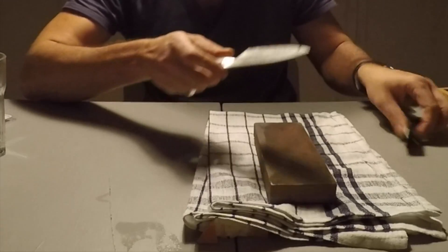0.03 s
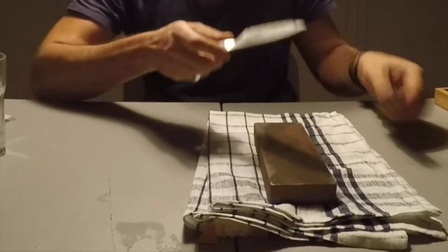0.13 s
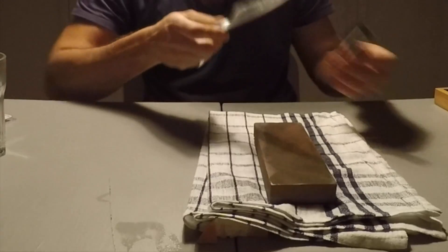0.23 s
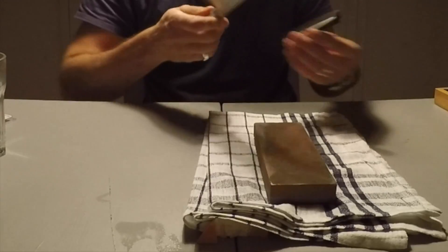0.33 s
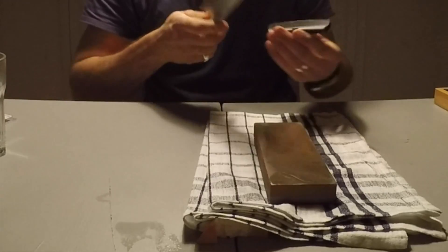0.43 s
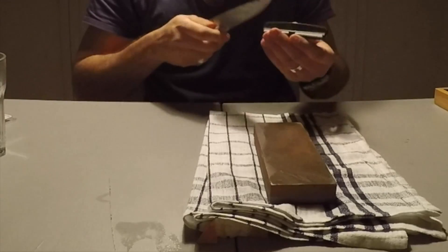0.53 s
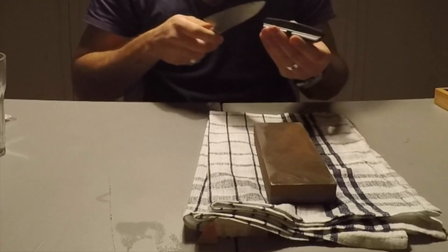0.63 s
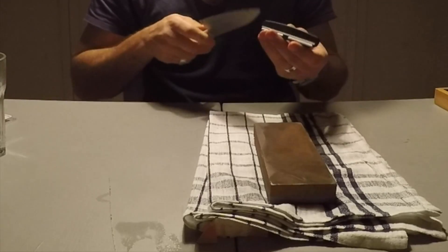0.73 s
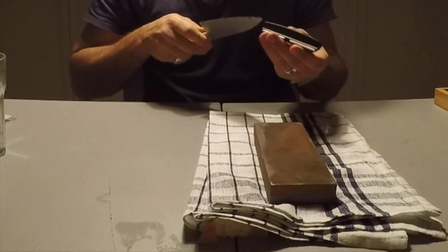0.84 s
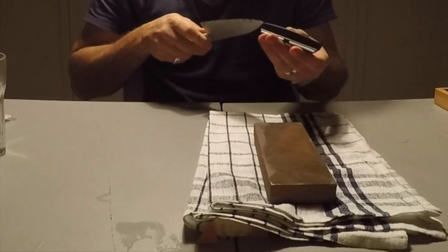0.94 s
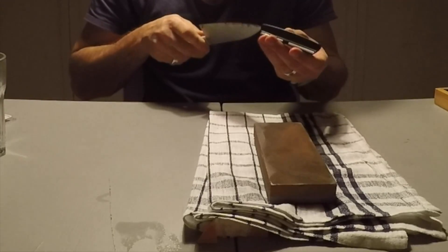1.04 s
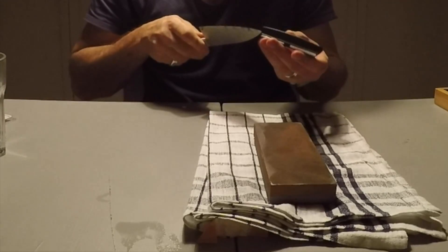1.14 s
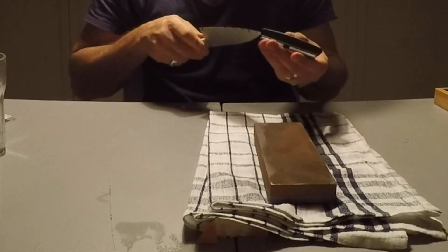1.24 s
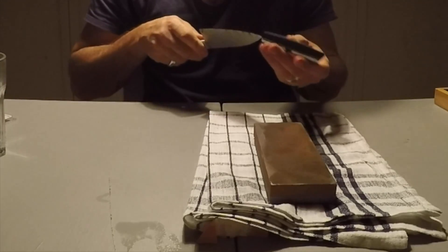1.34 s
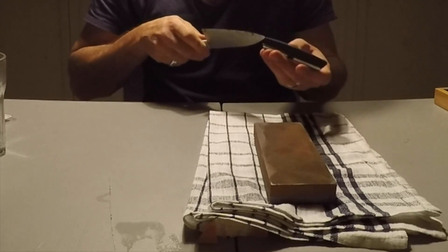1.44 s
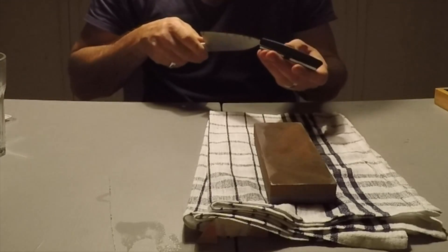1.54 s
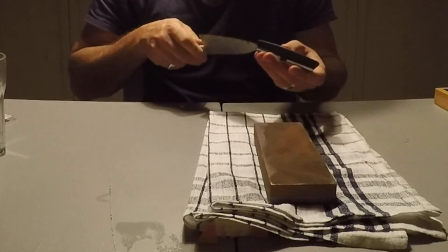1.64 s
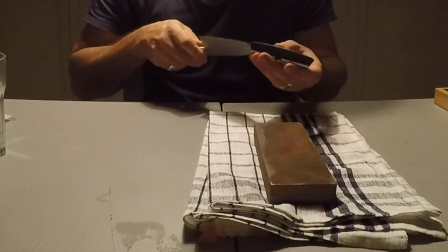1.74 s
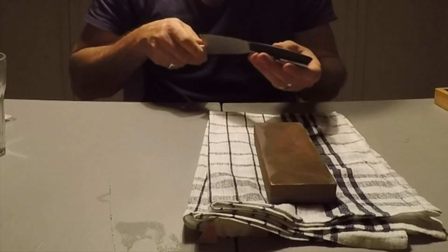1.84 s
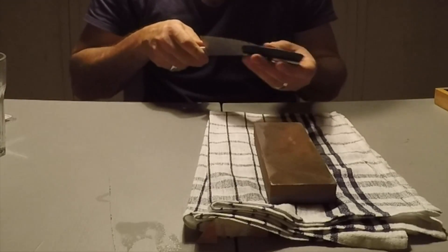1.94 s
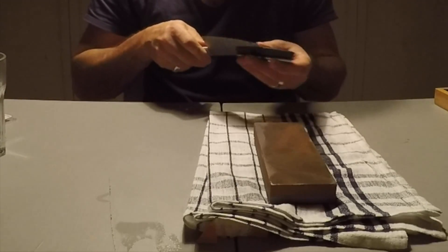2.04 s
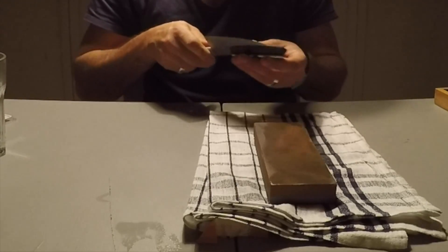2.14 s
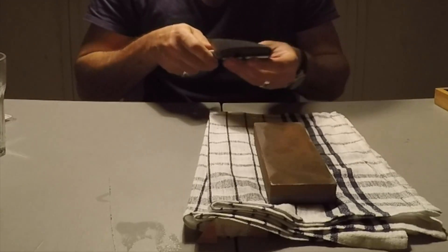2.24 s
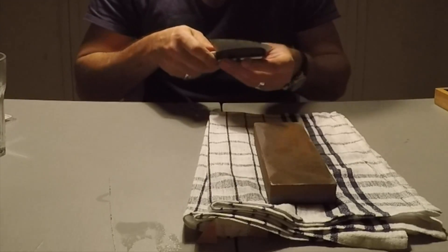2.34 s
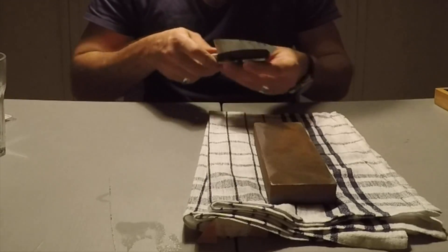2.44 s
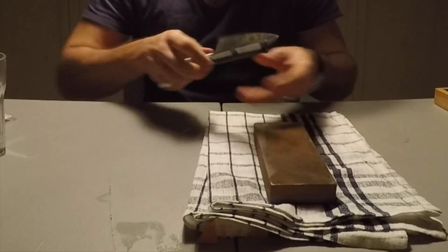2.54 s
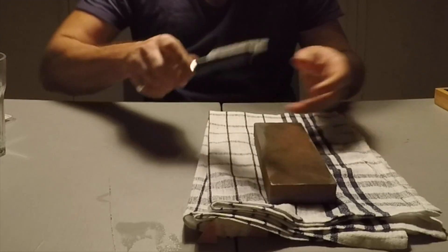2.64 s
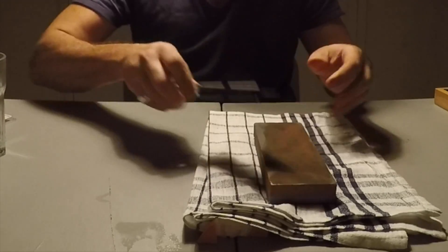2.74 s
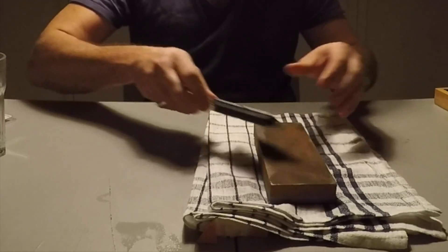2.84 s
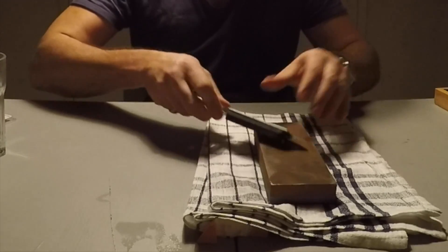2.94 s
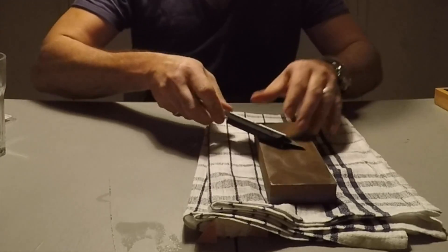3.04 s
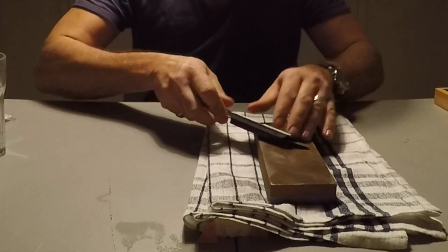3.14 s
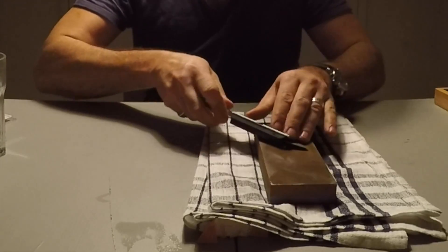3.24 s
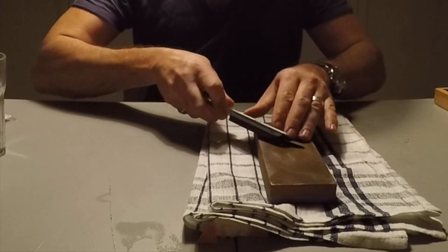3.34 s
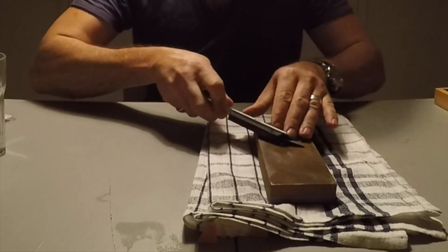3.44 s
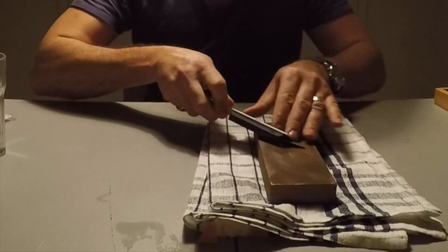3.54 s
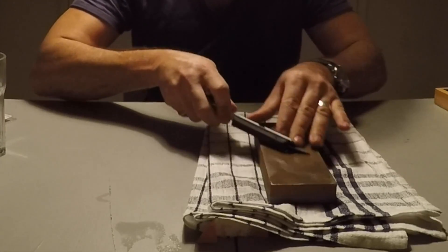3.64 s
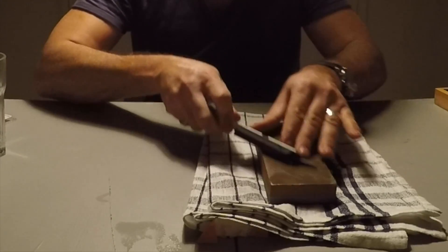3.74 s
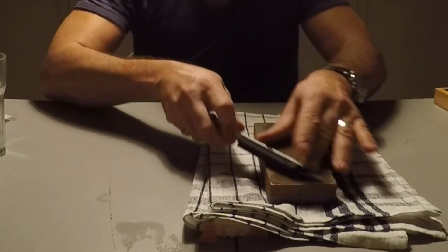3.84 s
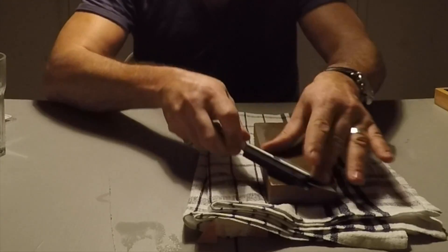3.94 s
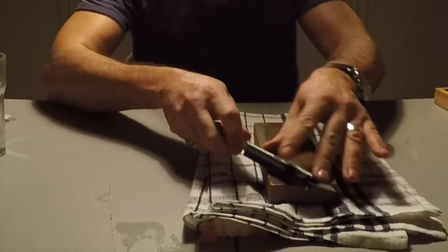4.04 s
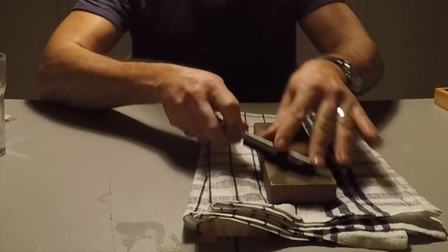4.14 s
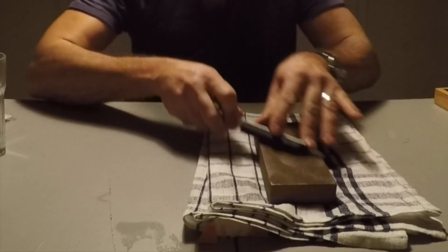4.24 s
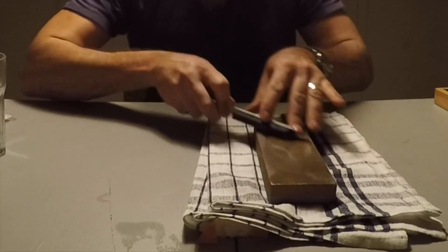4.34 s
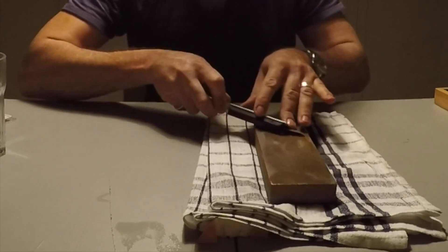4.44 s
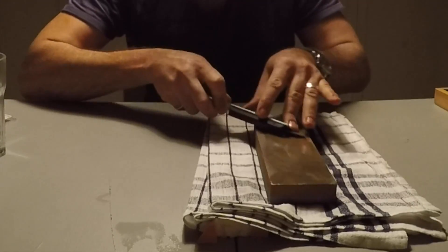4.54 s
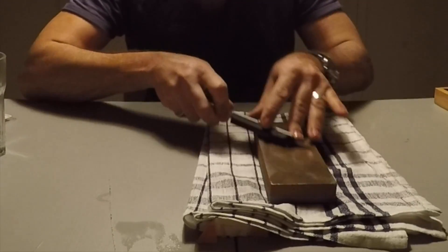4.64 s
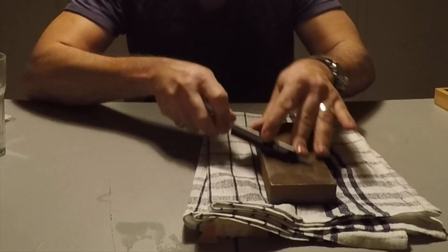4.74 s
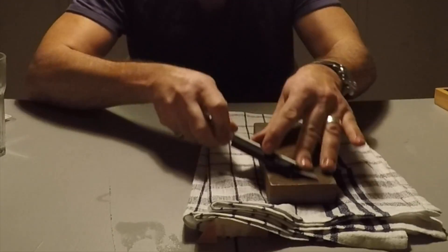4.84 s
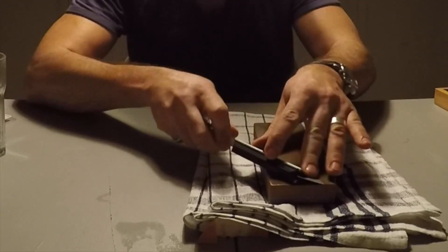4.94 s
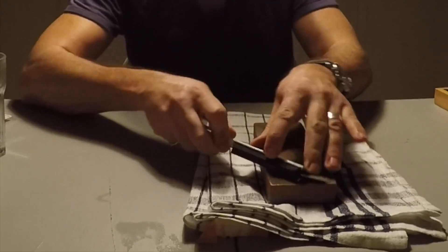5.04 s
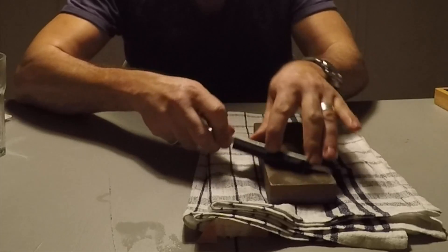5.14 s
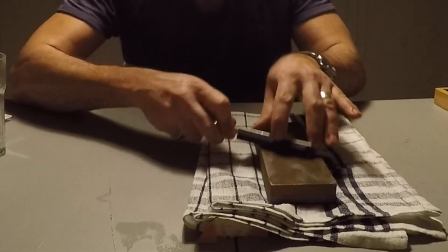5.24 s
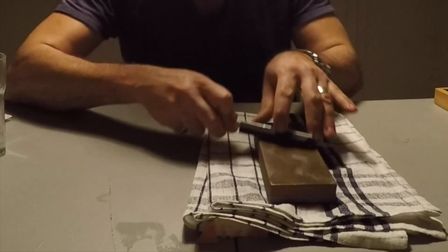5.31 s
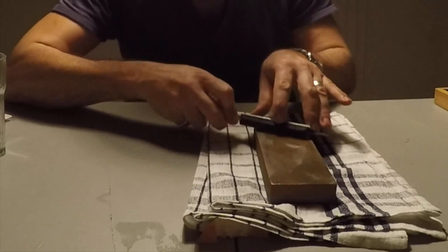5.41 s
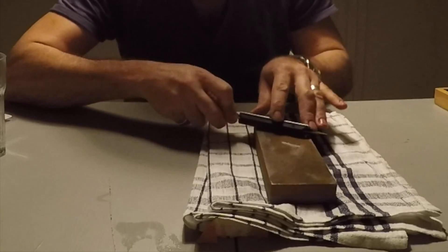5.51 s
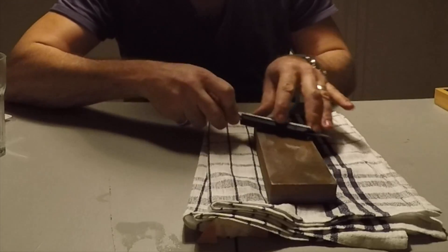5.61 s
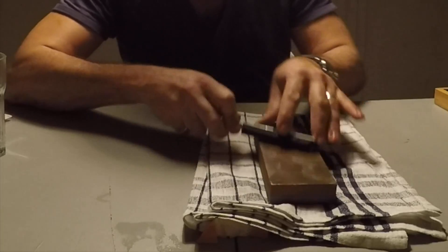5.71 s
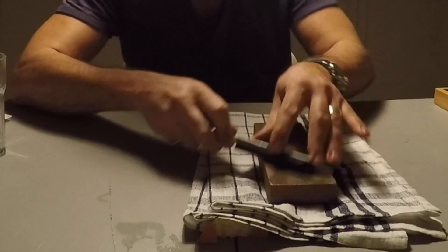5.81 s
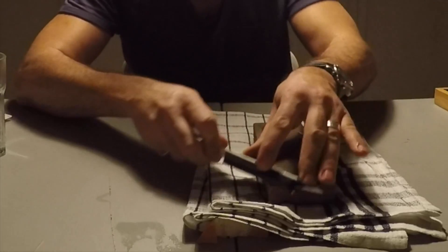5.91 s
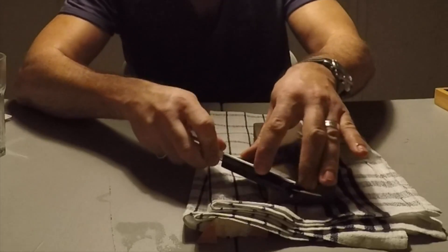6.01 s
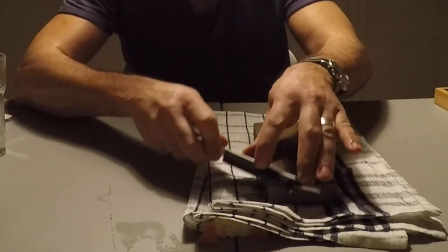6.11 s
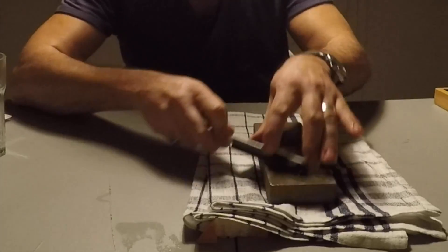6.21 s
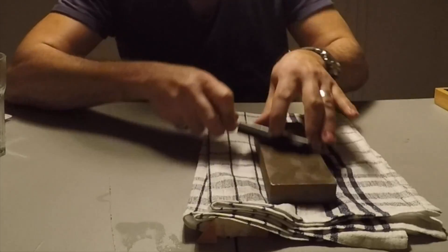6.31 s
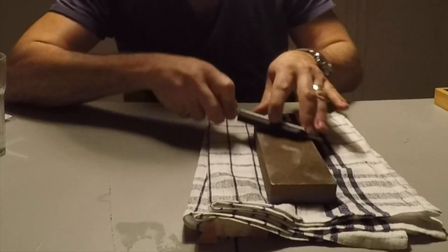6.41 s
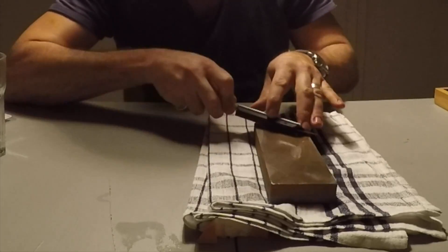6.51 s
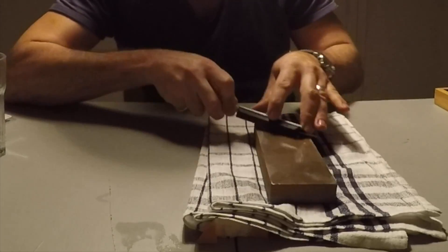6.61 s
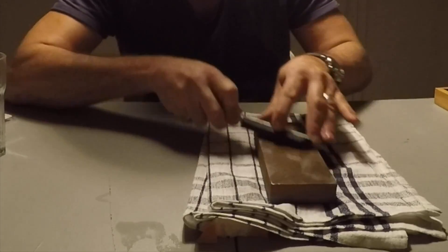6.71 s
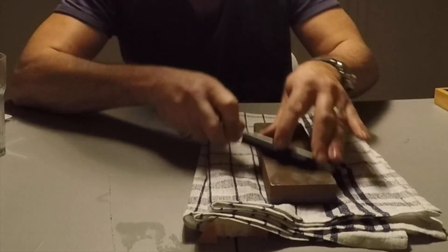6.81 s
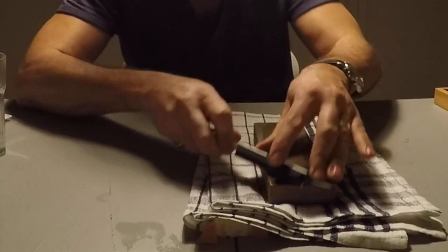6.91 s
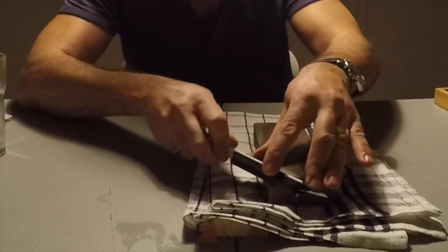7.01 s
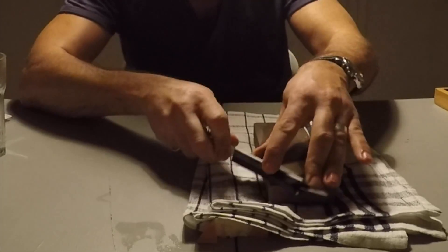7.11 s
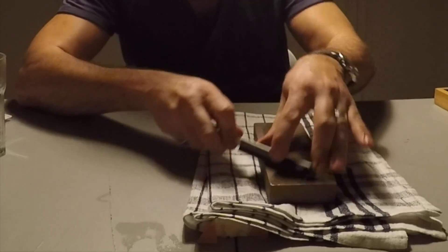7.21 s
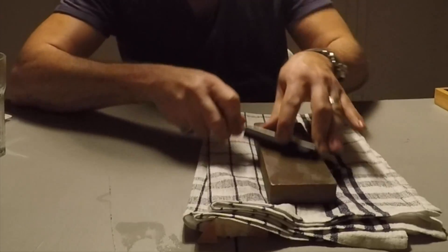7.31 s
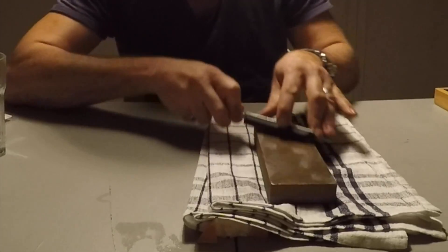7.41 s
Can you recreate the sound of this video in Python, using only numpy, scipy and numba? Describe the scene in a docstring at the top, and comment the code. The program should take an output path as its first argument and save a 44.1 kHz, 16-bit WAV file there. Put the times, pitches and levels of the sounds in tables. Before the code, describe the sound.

A small indoor room with quiet low rumble and a barely audible high whine, heard close up. At the very start a soft knock and dull thud on a table, a faint tick near 0.4 s, then near quiet. From 1.1 to 1.9 s small dry metallic ticks, clearest at 1.14 s, as a guide touches a knife spine; from 1.9 to 2.4 s it slides along with a thin, swelling, hissy rub that stops abruptly. At 2.8 s the free blade gives a bright short clink. At 3.08 s the edge hits the wet stone with a loud sharp clack, and quick short scrapes follow until 3.5 s. From 3.6 s to the end, loud alternating strokes of about half a second each rasp, ring and hiss, dipping at every turn, with gritty clicks around 4.8, 5.9, 6.3 and 6.8 s over a low pulsing table drone.

```python
"""A kitchen knife is sharpened on a wet whetstone on a towel on a table, in a small room with a faint whine.
First an angle guide knocks on the table (damped table modes), ticks against the spine and slides on
(scuffs and friction noise that excite the held blade); then the free blade clinks (modal ringing).
The knife lands on the stone and is pushed to and fro: grit impacts drive the modes of the pressed blade,
broad rasp and fine hiss come from filtered impacts, and friction keeps the table droning.
"""
import sys
import numpy as np
from scipy import signal
from scipy.fft import rfft, irfft
from scipy.io import wavfile
from scipy.ndimage import uniform_filter1d
from numba import njit

SR = 44100
rng = np.random.default_rng(int(sys.argv[2]) if len(sys.argv) > 2 else 0)


def int16_out(signal):
    """Quantize to a 16-bit WAV file."""
    q = np.round(np.clip(np.atleast_2d(signal).T, -1, 1) * 32767)
    wavfile.write(sys.argv[1], SR, q.astype(np.int16))


N = 329074
TIME = np.arange(N) / SR


def amp(db):
    """Logarithmic level: decibels to amplitude gain."""
    return 10 ** (np.asarray(db) / 20)


def rms_one(x):
    """Power normalisation: scale to unit mean square."""
    return x / np.sqrt(np.mean(x ** 2) + 1e-20)


def peak_one(x):
    """Peak normalisation: scale to unit height."""
    return x / (np.abs(x).max() + 1e-20)


def drift(rate):
    """Low-rate random modulation: interpolated chance of about unit spread, with rate new values a second."""
    knots = rng.standard_normal(8192)
    return np.interp(TIME * rate, np.arange(len(knots)), rms_one(knots))


def after(s):
    """Onset gate: zero until a moment, then a 5 ms ramp to one."""
    return np.clip((TIME - s) / .005, 0, 1)


def hump(s, width_s):
    """Gaussian window: a smooth bump of height one around a moment."""
    return np.exp(-np.minimum(((TIME - s) / width_s) ** 2, 20))


def colour(x, spectrum):
    """Minimum-phase filtering: a causal response, folded from the cepstrum, follows a spectrum."""
    size = 8192
    hz, db = np.transpose(spectrum)
    grid = np.maximum(np.fft.rfftfreq(size, 1 / SR), 1)
    level_db = np.interp(np.log(grid), np.log(hz), db)
    cepstrum = irfft(np.log(amp(level_db)))
    cepstrum[1:size // 2] *= 2
    cepstrum[size // 2 + 1:] = 0
    response = irfft(np.exp(rfft(cepstrum)))
    return signal.fftconvolve(x, response)[:len(x)]


def resonate(x, hz, width):
    """Damped resonance: a two-pole filter that passes the same noise power whatever its width."""
    r = np.exp(-np.pi * width / SR)
    zeros = np.sqrt(1 - r * r) * np.array([1, 0, -1])
    poles = [1, -2 * r * np.cos(2 * np.pi * hz / SR), r * r]
    return signal.lfilter(zeros, poles, x + 1e-18)


def body(x, modes):
    """Modal superposition: parallel resonances with alternating signs."""
    return sum((-1) ** k * amp(db) * resonate(x, hz, width) for k, (hz, width, db) in enumerate(modes))


def band(x, low_hz, high_hz):
    """Band-pass filtering: keep one range of frequency."""
    edges = [low_hz, min(high_hz, SR * .45)]
    return signal.sosfilt(signal.butter(2, edges, "band", fs=SR, output="sos"), x)


def grit(per_s, spread_db):
    """Shot noise: random tiny impacts, many small and a few large; unit power at any rate."""
    chance = np.clip(per_s / SR, 1e-4, 1)
    sizes = amp(spread_db * np.minimum(rng.exponential(1, N), 5)) * rng.choice([-1, 1], N)
    struck = rng.random(N) < chance
    return rms_one(sizes * struck / np.sqrt(chance))


def scuff(length):
    """Decaying noise: a quarter second holding one burst of rough contact with time constant length."""
    t = TIME[:SR // 4]
    return rng.standard_normal(len(t)) * np.exp(-t / length)


def add(out, s, sound):
    """Linear superposition: mix a sound in at its time."""
    at = max(round(s * SR), 0)
    out[at:at + len(sound)] += sound[:N - at]


def patchy(x, depth_db=3.5, rate=16):
    """Spectral modulation: uneven patches of the surface favour now one part of the treble, now another."""
    out, rest = 0, x
    for hz in np.geomspace(2000, SR * .4, num=9):
        low = signal.sosfiltfilt(signal.butter(4, hz, fs=SR, output="sos"), rest)
        out, rest = out + low * amp(depth_db * drift(rate)), rest - low
    return rms_one(out)


# room tone spectrum: (frequency [Hz], relative density [dB per Hz])
ROOM_TONE = [(12, -23.5), (20, 2.5), (64, -4), (80, -14.5), (112, -9), (166, -15), (196, -8.5), (232, -20),
             (306, -23.5), (549, -29), (686, -31), (1130, -33), (10500, -43), (13100, -50), (15500, -44)]


def background(rumble_db=-40, whine_hz=12618, whine_db=-71):
    """Stationary noise and a pure tone: low room rumble and a faint electrical whine."""
    rumble = amp(rumble_db) * rms_one(colour(rng.standard_normal(N), ROOM_TONE))
    return rumble + amp(whine_db) * rms_one(np.sin(2 * np.pi * whine_hz * TIME))


# table top struck by the guide: (frequency [Hz], width [Hz], relative level [dB])
KNOCK_MODES = [(348, 63, -1.5), (407, 32, 0), (620, 110, -0.5), (854, 200, -2), (1175, 160, 1.5),
               (2600, 1100, -2.5), (5030, 5900, -1.5)]


def table_knocks(knock_db=-25, thud_db=-23, landing_db=-28):
    """Impact excitation: the lifted guide knocks on the table; later the knife pushes the stone into the towel."""
    out = np.zeros(N)
    knock = body(scuff(length=0.037), KNOCK_MODES)
    thud = band(scuff(length=0.074), low_hz=24.6, high_hz=71)
    landing = band(scuff(length=0.0079), low_hz=45.5, high_hz=180)
    add(out, .033, amp(knock_db) * peak_one(knock))
    add(out, .02, amp(thud_db) * peak_one(thud))
    add(out, 3.079, amp(landing_db) * peak_one(landing))
    return out


SLIDE_START_S, SLIDE_END_S, SLIDE_ATTACK_S = 1.93, 2.398, 0.016
SLIDE_DB = -35  # at the end of the slide, before the rub is shared between ring and hiss
SLIDE_SWELL_DB_PER_S, SLIDE_RELEASE_DB_PER_S, SLIDE_WAVER_DB = 10.5, 330, -0.4


def sliding():
    """Friction envelope: the rub sets in quickly, grows as the guide is pushed on, and stops."""
    attack = 1 - np.exp(-np.maximum(TIME - SLIDE_START_S, 0) / SLIDE_ATTACK_S)
    late = TIME - SLIDE_END_S
    db = SLIDE_DB + np.minimum(SLIDE_SWELL_DB_PER_S * late, -SLIDE_RELEASE_DB_PER_S * late)
    return attack * amp(db + SLIDE_WAVER_DB * drift(24.1))


# guide touching the spine: (time [s], peak level [dB], brightness [Hz], scuff time constant [s])
TICKS = [(0.3664, -39.5, 4500, 0.0034), (1.094, -39, 7000, .003), (1.128, -29, 3200, .012),
         (1.144, -24, 2680, 0.0045), (1.225, -38, 4000, .035), (1.305, -40.5, 5000, .025),
         (1.420, -40, 7000, 0.0077), (1.4303, -31.5, 5800, 0.0023), (1.6704, -31, 2590, .0035),
         (1.703, -40, 5000, 0.024), (1.787, -36.5, 3480, 0.016), (1.815, -38, 3500, .007),
         (1.9, -42, 3000, .03), (1.937, -26.5, 5660, 0.024)]
# blade held in the hand, with the guide on it: (frequency [Hz], width [Hz], relative level [dB])
HELD_MODES = [(1600, 34, -11.5), (1683, 9.2, -7), (2370, 580, -3.5), (3590, 220, 1.5), (5370, 450, 2),
              (6350, 350, -1), (7030, 220, -7)]
# fine hiss of the sliding guide: (frequency [Hz], relative density [dB per Hz])
GUIDE_HISS = [(500, -17), (1500, -8), (3000, -26), (6500, 14.5), (8200, 7.5), (10500, 8.5), (12500, 8),
              (16000, 7.5)]


def guide(grip_hz=140, ring_db=-12, rattle_db=-25, rattle_s=.04):
    """Contact damping: the guide ticks against the spine, then rubs along it and widens the blade's modes."""
    out = np.zeros(N)
    for s, db, bright_hz, length in TICKS:
        touch = scuff(length) + amp(rattle_db) * scuff(rattle_s)
        tick = band(body(touch, HELD_MODES) + touch, low_hz=600, high_hz=max(bright_hz, 1000))
        # the blade's lowest modes get an extra share of the ring
        tick += amp(ring_db) * body(touch, HELD_MODES[:2])
        add(out, s, amp(db) * peak_one(band(tick, low_hz=300, high_hz=6400)))
    unevenness = amp(0.74 * drift(97))
    rub = grit(per_s=3000, spread_db=2.0) * unevenness
    fine = grit(per_s=3000, spread_db=2.0) * unevenness
    gripped = [(hz, width + grip_hz, db) for hz, width, db in HELD_MODES]
    rings = rms_one(band(body(rub, gripped), low_hz=1600, high_hz=9300))
    hiss = patchy(colour(fine, GUIDE_HISS))
    return out + sliding() * (amp(-2.5) * rings + amp(-3.5) * hiss)


# free blade: (frequency [Hz], width [Hz], relative level [dB])
CLINK_MODES = [(1970, 60, -8), (2010, 140, 13), (2675, 1300, 4), (4620, 200, 5.5), (5100, 1100, 9.5),
               (6440, 140, 7), (6700, 84, 9), (6930, 31, 11), (8600, 30, 3), (8900, 340, 1), (9800, 35, 5),
               (10340, 150, -27), (10700, 200, 11)]


def clink(ring_db=-17.5, tick_db=-25, buzz_db=-20, buzz_s=0.065):
    """Modal ringing: metal brushes the free blade, and a brief chatter and a dying buzz excite its modes."""
    out = np.zeros(N)
    chatter = scuff(length=0.012)
    ring = body(chatter + amp(buzz_db) * scuff(buzz_s), CLINK_MODES)
    add(out, 2.8155, amp(ring_db) * peak_one(band(ring, low_hz=1720, high_hz=12100)))
    add(out, 2.8155, amp(tick_db) * peak_one(band(chatter, low_hz=2400, high_hz=14300)))
    return out


# the table's drone before its trim: (time [s], level [dB])
SHAKE = [(3.05, -54), (3.07, -47), (3.55, -52.5), (3.76, -34.5), (4.39, -39.5), (4.68, -29), (4.89, -36.5),
         (5.26, -36), (5.37, -49), (5.54, -29), (5.85, -25), (6.26, -36), (6.43, -51), (6.69, -35),
         (7.46, -44.5)]
# the table's other modes: (frequency [Hz], width [Hz], relative level [dB])
TABLE_MODES = [(40, 14.5, 2.5), (61.6, 31, -9.5), (134.2, 7.9, -3.5), (161.8, 7.6, -2), (259, 20, -11)]


def table_drone(drone_hz=104.2, trim_db=-0.5, wander_hz=0.95, rumble_db=-40, follow=0.25,
                growth_db_per_s=1.0):
    """Friction-driven vibration: the main mode hums and the others are stirred into a slowly growing rumble."""
    drone_db = np.interp(TIME, *np.transpose(SHAKE))
    phase = 2 * np.pi * np.cumsum(drone_hz + wander_hz * drift(7.4)) / SR
    hum = amp(drone_db + trim_db) * rms_one(np.sin(phase) * amp(1.7 * drift(23)))
    growth_db = growth_db_per_s * (TIME - SHAKE[0][0] - 2)
    level_db = rumble_db + follow * (drone_db - drone_db.mean()) + growth_db
    rumble = amp(level_db) * rms_one(body(rng.standard_normal(N), TABLE_MODES))
    return after(SHAKE[0][0]) * (hum + rumble)


# the hands lean on the blade for about LEAN_S as it reaches speed
LEAN_S = 0.041
# they brake this long before a stroke ends, for about BRAKE_S; the blade may chatter around that moment
BRAKE_LEAD_S, BRAKE_S, CHATTER_S = 0.096, 0.028, 0.043
CREEP, CREEP_S = .03, 0.022  # share of full strength left while the hands turn round, and its decay time
# strokes of the edge, four short ones to settle it, then away and back in turn:
# (start [s], end [s], speeding up [s], slowing down [s], scrape level [dB], swell over the stroke [dB],
#  lean on reaching speed [dB], flex-mode chatter while braking [dB], fine hiss re scrape [dB],
#  flex mode at mid-stroke [Hz], bend mode at the start [Hz], extra bend and hiss in the turn before it [dB])
STROKES = [(3.071, 3.189, 0.088, 0.051, -27, 6, -2.5, 10.5, -14, 1700, 3700, -4),
           (3.188, 3.261, .027, 0.064, -27, 1, -0.5, -3, -13, 1550, 3570, 0),
           (3.235, 3.326, 0.071, 0.082, -26, -5.5, 5.5, -1, -9.5, 1240, 3500, 3),
           (3.293, 3.522, 0.17, 0.12, -28.5, -2.5, 1.5, 2.5, -8, 1230, 3500, 5),
           (3.585, 4.117, .22, 0.15, -20.5, -6, 4, 7.5, -5, 1570, 3770, 0.5),
           (4.109, 4.586, 0.16, 0.22, -19.5, -0.5, 1, -4.5, -4.5, 1710, 3370, -1),
           (4.588, 5.133, 0.081, 0.34, -21.5, 3, -1, 3, -2, 1600, 4000, 6),
           (5.06, 5.62, 0.23, 0.17, -22, 1.5, 2.5, 3.5, -5, 1580, 3770, -1),
           (5.644, 6.107, 0.12, .14, -21, -3.5, 0.5, 13.5, -1, 1740, 3150, 3.5),
           (6.164, 6.667, 0.087, 0.24, -19, 7.5, 1, -6, -6.5, 1330, 3520, 3),
           (6.647, 7.176, 0.14, .2, -19, -2.5, 4.5, 11.5, -2.5, 1530, 3600, -3),
           (7.181, 7.65, 0.081, .14, -20.5, 4, 1.5, 0, -6.5, 1500, 3020, -1.5)]


def hands():
    """Stroke kinematics: speed up, lean, hold, brake. Gives strength, progress, braking and chatter."""
    strength, progress, braking, chatter_db = np.zeros((4, N))
    for start, end, rise, fall, db, swell_db, lean_db, judder_db, *_ in STROKES:
        along = np.clip((TIME - start) / (end - start), 0, 1)
        speeding_up = np.sin(np.pi / 2 * np.clip((TIME - start) / rise, 0, 1))
        slowing_down = np.sin(np.pi / 2 * np.clip((end - TIME) / fall, 0, 1)) ** 2
        crawl = CREEP * np.exp(-np.abs(TIME - end) / CREEP_S)
        lean, brake = hump(start + rise, LEAN_S), hump(end - BRAKE_LEAD_S, BRAKE_S)
        level = amp(db + swell_db * (along - .5) + lean_db * lean)
        # overlapping strokes add in power
        strength = np.hypot(strength, (speeding_up * slowing_down + crawl) * level)
        progress = np.where(TIME > start, along, progress)
        braking = np.maximum(braking, brake)
        chatter_db = chatter_db + judder_db * hump(end - BRAKE_LEAD_S, CHATTER_S)
    return strength, uniform_filter1d(progress, size=SR // 25), braking, chatter_db


FLEX_DB, FLEX_FOLLOWS = -38, 0.48  # lowest mode in a full stroke; share of the scrape's swing it follows
FLEX_REST_HZ, BEND_HZ = 1660, 3510  # lowest mode at the ends of a stroke; next mode at mid-stroke
BEND_DB, BEND_BRAKE_DB = -8, 7  # next mode re scrape; its gain while braking
HISS_ENDS_DB = -5  # the slurry hisses less at the ends of a stroke than in its middle
RASP_FOLLOWS = 0.13  # dB of rasp re scrape that each dB of a harder stroke adds


def contact(waver_db=1.0, waver_rate=16):
    """Moving contact: level and tone of the scrape change along the edge under a slightly unsteady hand."""
    strength, progress, braking, chatter_db = hands()
    starts, ends, _, _, levels, *_, hisses, flexes, bends, turns = np.transpose(STROKES)
    centres, middle = (starts + ends) / 2, np.sin(np.pi * progress)
    turn_db = np.interp(TIME, starts, turns) * (1 - middle ** 2)
    scrape_db = 20 * np.log10(np.maximum(strength, 1e-3))
    flex_db = FLEX_DB + FLEX_FOLLOWS * (scrape_db - levels.max()) + chatter_db
    flex_hz = FLEX_REST_HZ * (1 - middle) + np.interp(TIME, centres, flexes) * middle
    bend_db = BEND_DB + BEND_BRAKE_DB * braking + turn_db
    bend_hz = np.interp(TIME, starts, bends) * (1 - middle ** 2) + BEND_HZ * middle ** 2
    hiss_db = np.interp(TIME, centres, hisses) + HISS_ENDS_DB * (1 - middle) + turn_db
    rasp_db = RASP_FOLLOWS * (np.interp(TIME, centres, levels) - np.median(levels))
    return scrape_db + waver_db * drift(waver_rate), flex_db, flex_hz, bend_db, bend_hz, hiss_db, rasp_db


@njit
def gliding(x, angle, r):
    """Time-varying resonance: a complex pole whose centre, in radians per sample, moves."""
    out, state = np.empty(len(x)), 0j
    for i in range(len(x)):
        state = state * r[i] * np.exp(1j * angle[i]) + x[i]
        out[i] = state.real
    return out


def blade_mode(force, hz, width_hz, sway_db=2.5, wander_db=0.5):
    """Moving boundary condition: the sliding contact bends a mode's pitch and varies its strength."""
    centre = hz * (1 + .016 * drift(25))
    ring = gliding(force, 2 * np.pi * centre / SR, np.exp(-np.pi * width_hz / SR))
    ring = band(ring, low_hz=np.min(hz) * 0.906, high_hz=np.max(hz) * 1.25)
    # the bite of the stone holds the ring at an even strength
    ring /= np.sqrt(np.abs(uniform_filter1d(ring ** 2, size=SR // 25)) + 1e-12)
    return rms_one(ring * amp(sway_db * drift(110) + wander_db * drift(21)))


def table_echo(x, delay_s=.0021, travel=0.079, depth=0.24):
    """Comb filtering: the table mirrors the blade, and the changing path slides ripples through the spectrum."""
    lag = delay_s * (1 + travel * drift(7))
    return (x + depth * np.interp(TIME - lag, TIME, x)) / np.sqrt(1 + depth ** 2)


# blade pressed on the stone: (frequency [Hz], width before touch damping [Hz], relative level [dB])
EDGE_MODES = [(5027, 670, 3), (5156, 400, 6.5), (7073, 200, -0.5), (7500, 2100, -3), (9800, 420, -4)]
# broad rasp of the stone: (frequency [Hz], relative density [dB per Hz])
RASP = [(150, -0.5), (400, -15.5), (650, -10.5), (900, -9), (1150, -14), (1500, -9), (2100, -3), (2700, 2),
        (4400, 7), (6200, 0), (8000, -13), (11000, -31), (16000, -4)]
# fine hiss of the slurry: (frequency [Hz], relative density [dB per Hz])
HISS = [(3000, -53), (6000, 0), (7800, 4.5), (9700, -3.5), (11000, -4), (12500, -4.5), (14000, -4),
        (16000, -8.5)]


def sharpening(grains_per_s=7000, spread_db=2.0, judder_db=-0.7, judder_rate=260, lurch_db=0.1,
               lurch_rate=85, zing_hz=8100, zing_rise=0.41):
    """Impact-driven resonance: grit breaks under the edge and rings the blade under juddering pressure."""
    scrape_db, flex_db, flex_hz, bend_db, bend_hz, hiss_db, rasp_db = contact()
    # a faster stroke meets more grains each second
    speed_db = scrape_db - scrape_db.max()
    rate = grains_per_s * amp(.5 * speed_db)
    pressure = rms_one(amp(judder_db * drift(judder_rate) + lurch_db * drift(lurch_rate)))
    force = grit(rate, spread_db) * pressure
    # a light, slow touch damps the steel less
    damping = amp(0.077 * np.maximum(speed_db, -25))
    edge = sum(amp(db) * blade_mode(force, hz, width * damping) for hz, width, db in EDGE_MODES)
    bend = amp(bend_db) * blade_mode(force, bend_hz, width_hz=460 * damping)
    steel = amp(-1.64) * rms_one(edge) + bend
    flex = amp(flex_db) * blade_mode(force, flex_hz, width_hz=340 * damping)
    # the stone adds a broad rasp that gains on the ring in harder strokes, and its slurry a fine hiss
    rasp = amp(rasp_db - 5.5) * patchy(colour(grit(rate, spread_db), RASP))
    hiss = patchy(colour(grit(rate * 2.3, spread_db=2.5), HISS))
    # a zing in the hiss climbs as the stroke brightens
    brighter_db = hiss_db - np.median(hiss_db[TIME > STROKES[0][0]])
    zing_centre = zing_hz * amp(zing_rise * brighter_db)
    zing = amp(-7.5) * blade_mode(grit(rate, spread_db), zing_centre, width_hz=900 * damping)
    stone = (rasp + amp(hiss_db) * (hiss + zing)) * pressure
    return after(STROKES[0][0]) * table_echo(flex + amp(scrape_db) * (steel + stone))


# edge striking the stone or catching on coarse grit: (time [s], peak level [dB])
CATCHES = [(3.0763, 0), (3.086, -11), (3.146, -13), (3.197, -15), (3.598, -34), (3.984, -16), (4.14, -20),
           (4.23, -14), (4.768, -5.5), (5.064, -22), (5.656, -20), (5.881, -9), (6.181, -50), (6.268, -7),
           (6.772, -3.5)]
# lower modes of the pressed blade, woken by hard blows: (frequency [Hz], width [Hz], relative level [dB])
LOW_MODES = [(1020, 240, -16), (1590, 160, -10), (3630, 170, -2.5)]


def catches(contact_s=0.00056, low_follows=0.33):
    """Impulsive excitation: short blows on the stone-damped blade; harder ones wake more of its lower modes."""
    out = np.zeros(N)
    for s, db in CATCHES:
        blow = scuff(contact_s) * 0.2
        blow[0] += 2
        ring = body(blow, EDGE_MODES) + amp(low_follows * db) * body(blow, LOW_MODES)
        add(out, s, amp(db) * peak_one(band(ring, low_hz=700, high_hz=5500)))
    return out


def room(x, wet_db=-12.0, dull_hz=7000):
    """Diffuse reverberation: dense, slightly dull reflections from near walls decay exponentially."""
    t, t60 = TIME[:SR], .38
    tail = rng.standard_normal(SR) * amp(-60 * t / t60) * (t > .004)
    tail = band(tail, low_hz=141, high_hz=dull_hz)
    return x + amp(wet_db) * signal.fftconvolve(x, tail / np.sqrt(np.sum(tail ** 2)))[:N]


def scene():
    """Superposition: knife and guide in the room, over the table's drone and the background."""
    knife = table_knocks() + guide() + clink() + sharpening() + catches()
    return (background() + table_drone() + room(knife))[None]


def record(dry, cutoff_hz=15250):
    """Clipping and low-pass filtering: the highest peaks overload, and the top is cut steeply."""
    held = np.clip(dry, -.95, .95)
    return signal.sosfilt(signal.ellip(12, .1, 70, cutoff_hz, fs=SR, output="sos"), held)


dry = scene()
out = record(dry)
int16_out(out)
```